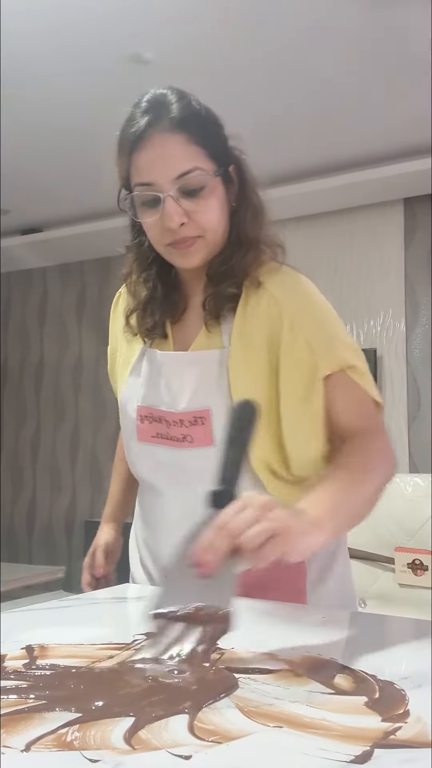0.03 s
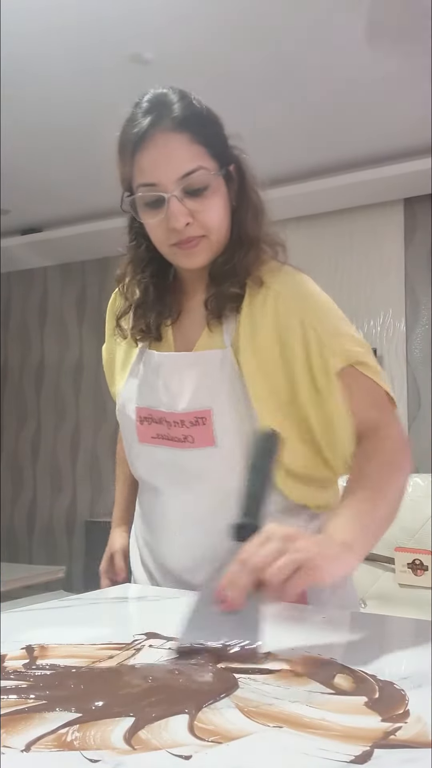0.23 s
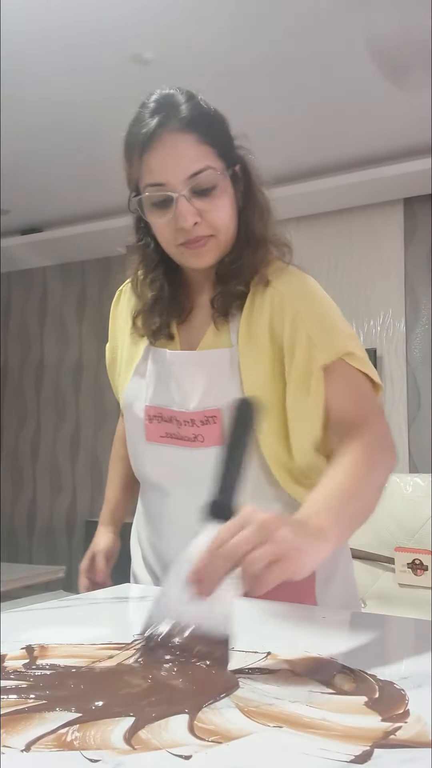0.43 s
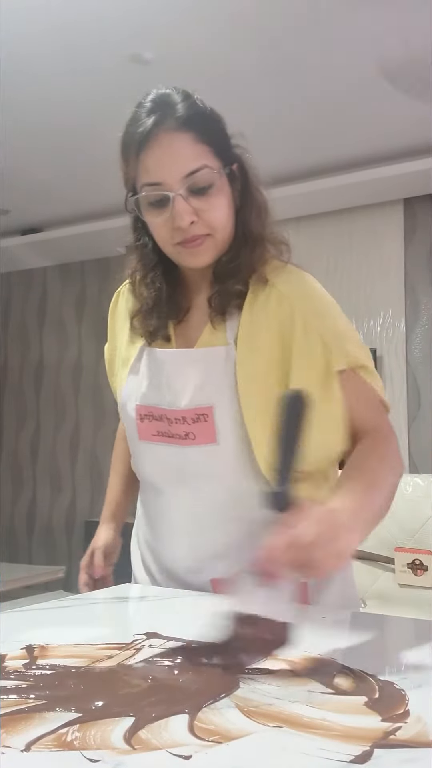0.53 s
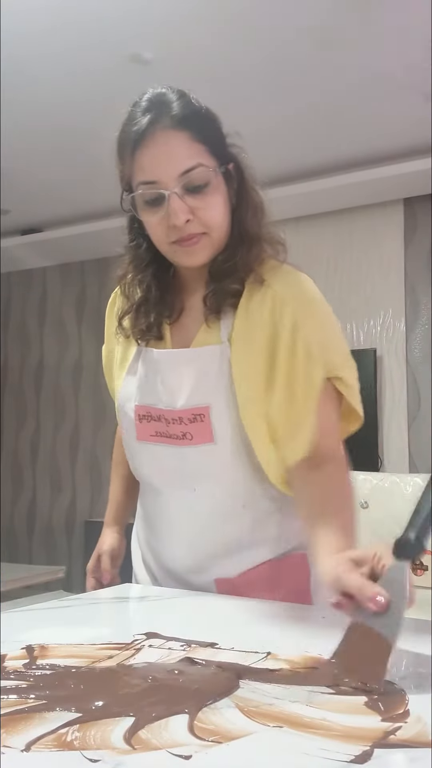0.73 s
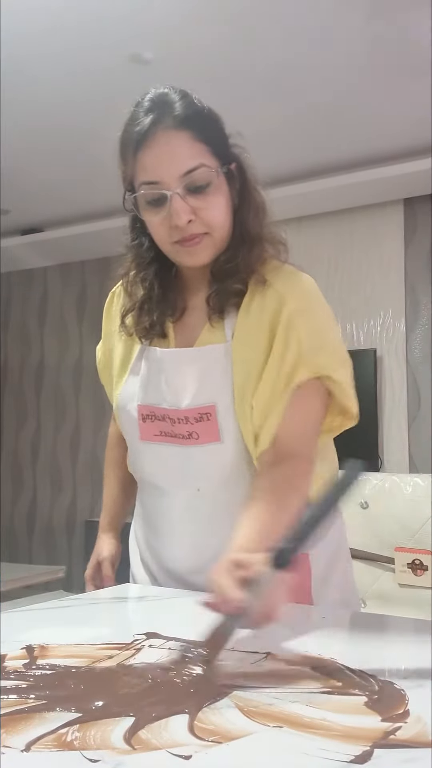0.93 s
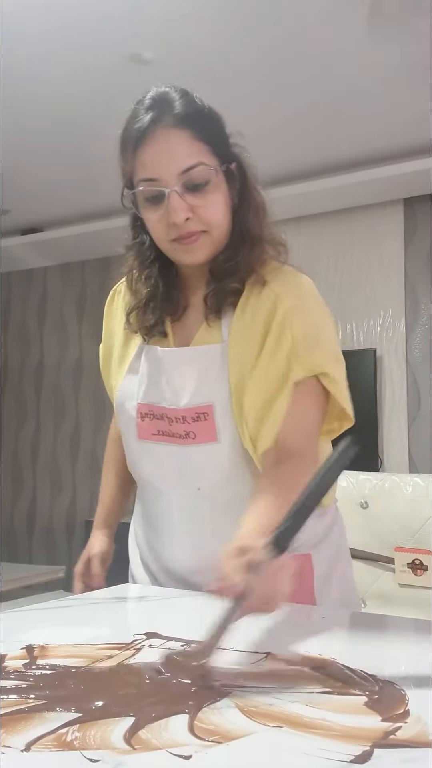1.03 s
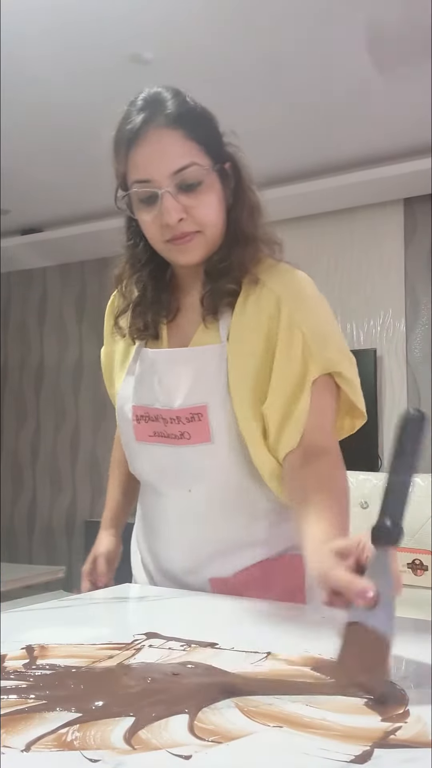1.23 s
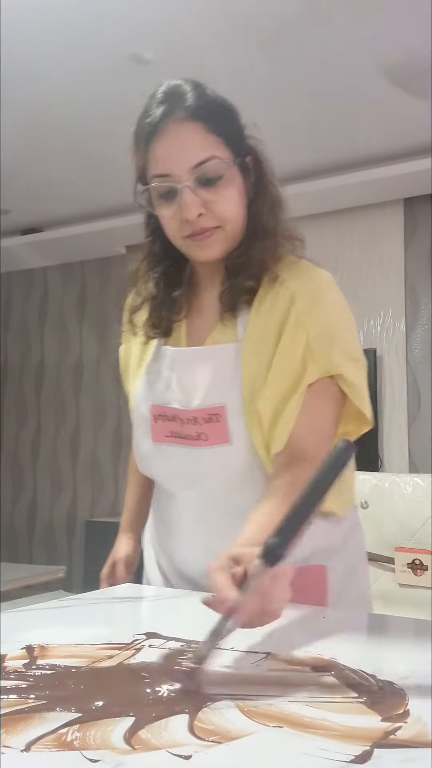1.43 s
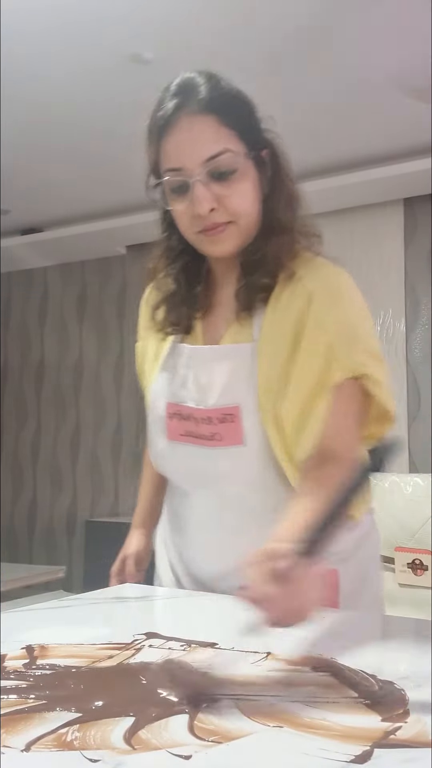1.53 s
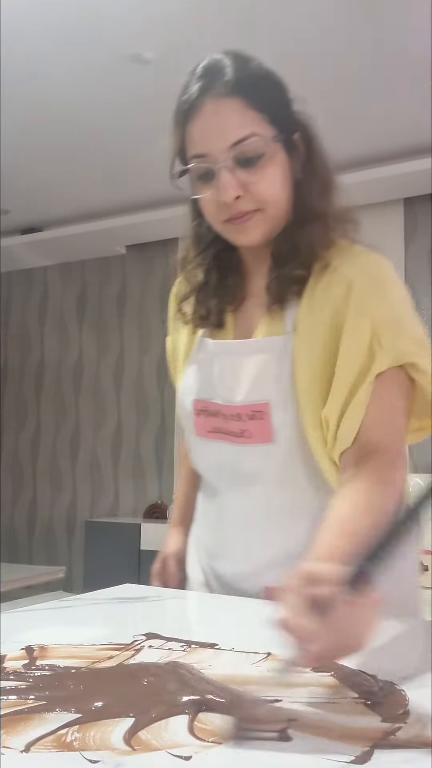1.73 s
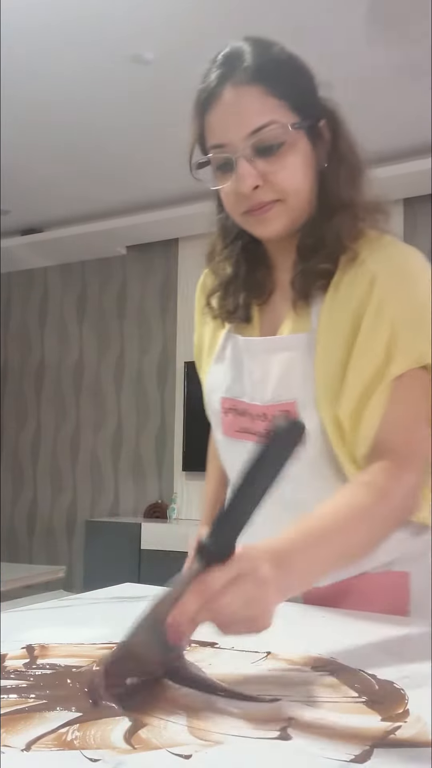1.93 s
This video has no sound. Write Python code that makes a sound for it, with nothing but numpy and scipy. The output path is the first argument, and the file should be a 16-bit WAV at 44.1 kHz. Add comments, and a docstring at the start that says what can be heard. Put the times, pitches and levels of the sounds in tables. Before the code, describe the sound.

A hand-damped steel scraper knocks on a marble slab: a quick, bright, gritty triple contact at 0.2 seconds, a duller knock at 0.7, a double clack at 1.3 and a softer double tap at 1.7. Faint hisses through melted chocolate follow at 0.8-1.0, 1.4-1.5 and 1.8-1.95. A small hard room rings briefly over low wavering hum; phone stereo, slightly right.

```python
"""A small hard room with a low wavering hum; a stereo pair hears the right side first, by 0.13 ms.
Four times a steel scraper is set down on a marble slab: a few quick contacts of the edge, each a filtered knock,
a gritty noise crack, the short modal ring of the hand-damped blade, a shudder of the table and the room's answer.
After each of the last three landings, and once the second has settled, the edge hisses faintly through melted
chocolate: shaped noise with sparse grit. The phone cuts everything above 15.8 kHz."""
import sys
import numpy as np
from scipy import signal
from scipy.fft import rfft, irfft
from scipy.io import wavfile
from scipy.ndimage import uniform_filter1d

SR = 44100
rng = np.random.default_rng(int(sys.argv[2]) if len(sys.argv) > 2 else 0)


def master(y):
    """Save y as 16-bit WAV."""
    cut = np.clip(np.atleast_2d(y).T, -1, 1)
    pcm = np.round(cut * 32767)  # scale
    wavfile.write(sys.argv[1], SR, pcm.astype(np.int16))


N = 88200  # two seconds

# Air of the room: [f/Hz, relative level per Hz/dB]
AIR_SPECTRUM = [(25, -14), (59, -5), (185, -5.5), (300, -9.5), (550, -13.5), (750, -15.5), (1000, -22.5),
                (1600, -24), (2800, -27), (4400, -35), (6500, -40.5), (10000, -52), (16000, -57)]
# Hum of the room, before panning: [f/Hz, rms level/dB]
HUM_TONES = [(76, -60), (134, -72.5), (195, -62.5), (490, -70.5)]
# Contacts of edge and slab; where the edge lands decides which modes ring:
# [t/s, then level/dB of thud, body, knock, clack, tick, sizzle,
#  then ring level/dB of handle, low bend, high bend, steel]
CONTACTS = [(0.1960, 9.5, 17.5, 20, 5, -3, -10.5, 4.5, -1.5, 1, 8.5),
            (0.1971, 2, 7.5, 15, 13.5, 4.5, 6, -3, -4.5, -19, 4),
            (0.1983, 6.5, 9, 9, 5.5, 4, -9, -3, -14, 3.5, 4),
            (0.2074, 11, 7.5, 2, 0, -26, -25, -34, 4.5, -7, 1),
            (0.7152, 10.5, 16, 18, 5, -16, -27, -15.5, -14, -8, -11),
            (0.777, -5, 5, -2.5, -25, -34, -48, 6.5, -3.5, -10.5, -17),
            (1.2902, 8, 10.5, 15, 13, -5, -6, 6, 6.5, -25, -12.5),
            (1.2947, 7, 5, 13, 0, -13, -24, 13.5, 0, -15.5, -4),
            (1.3239, 6, 15, 13, 4.5, -13.5, -29, 4, 3, 5, 8),
            (1.7114, 3.5, 13.5, -9, 1, -15, -34, -7, -5, -25, 0),
            (1.7164, -0.5, 8.5, 3.5, 3.5, -7, -10.5, 3.5, -10, 10, 0)]
# Where thud, body, knock, clack, tick and sizzle lie: [f/Hz]
CONTACT_HZ = [400, 800, 1400, 3400, 7000, 14000]
# Where handle, low bend, high bend and steel modes lie: [f/Hz]
RING_HZ = [510, 1225, 1680, 3420]
# Modes of blade and handle, before each contact's weighting: [f/Hz, peak gain/dB, t60/s]
BLADE_MODES = [(253.6, -14, .09), (509, 1.5, 0.35), (550, 4.5, .09), (706, -0.5, .06), (943, -3.5, .13),
               (1216, 5.5, 0.046), (1674, 2.5, .07), (1860, 5.5, .06), (3040, 2.5, 0.15), (3310, 3.5, 0.14),
               (3580, 1.5, .16), (3936, 0.5, 0.066), (5080, 7.5, 0.12), (11450, 2, .045)]
# Spectra of one contact, before each contact's weighting: [f/Hz, level/dB]
KNOCK_SPECTRUM = [(40, -23.5), (120, -16.5), (280, 1.5), (500, -6), (1000, -7.5), (1750, 1), (2250, -21.5),
                  (3300, 1), (4400, -10.5), (5200, -10), (6200, -3.5), (16000, -19)]
CRACK_SPECTRUM = [(100, -58), (1200, -18), (1700, -23.5), (2300, -16), (3350, -7), (4400, -12.5),
                  (5200, 0.5), (6100, -7.5), (8300, -11.5), (10000, -8), (11400, -2), (13000, -13),
                  (16000, -32.5)]
SHUDDER_SPECTRUM = [(40, -29), (120, -2), (250, -12.5), (450, 6), (950, -8), (1300, -5.5), (1750, -10),
                    (2300, -10), (3350, -3.5), (4400, -12.5), (5200, -4), (6200, -6.5), (8300, -8.5),
                    (16000, -22.5)]
ROOM_SPECTRUM = [(50, -1.5), (130, -7), (450, -3.5), (1000, -20.5), (1800, -9.5), (2400, -13.5),
                 (3400, -11.5), (7000, -12), (16000, -25)]
# Decay of the table and of the room: [f/Hz, t60/s]
SHUDDER_T60 = [(120, .14), (500, 0.12), (1500, 0.062), (4000, 0.24), (12000, 0.044)]
ROOM_T60 = [(120, 0.23), (600, 0.81), (2000, 0.55), (5000, 0.63), (13000, 0.48)]
# Stereo balance of the direct sound: [f/Hz, left minus right level/dB]
DIRECT_PAN = [(120, -0.5), (500, -3), (1400, -2), (3500, -6.5), (8000, 6.5)]
# Strokes of the edge through the chocolate: [start t/s, end t/s, level/dB]
STROKES = [(0.788, 1.008, -63.5), (1.367, 1.487, -59.5), (1.78, 1.956, -62)]
# Hiss of the edge on stone: [f/Hz, relative level per Hz/dB]
HISS_SPECTRUM = [(300, -8.5), (1000, 2.5), (3200, -0.5), (4400, -14.5), (7000, -8.5), (9000, -15.5),
                 (14000, -15.5), (16000, -19)]

AIR_DB, AIR_FLICKER_DB, AIR_FLICKER_PER_S = -51.5, 0.67, 13.9
HUM_WAVER, HUM_WAVER_PER_S = 0.71, 5.2
# Above about this pitch the two microphones hear unrelated noise
AIR_WIDE_HZ, WIDE_HZ = 1250, 800
DIFFUSE_PAN_DB, LEFT_LAG_S = -1.75, 0.00013
BLOW_SIZE = 16384  # samples in one contact
CRACK_T60_S = 0.027
SHUDDER_ONSET_S, SHUDDER_DB = 0.0018, 1.5
ROOM_ONSET_S, ROOM_DB = 0.0091, -1.5
RING_ROOM_DB = 2  # weight of the blade's ring against the knock in what the room hears
DISPERSION_HZ, DISPERSION_WIDTH_HZ = 1430, 810  # bending waves near this pitch arrive late
STROKE_ATTACK_S, STROKE_RELEASE_S = 0.038, 0.024
GRIT_PER_S, GRIT_DB = 320, -12.5
TOP_HZ = 15800


def undb(db):
    """Decibels to gain."""
    return 10 ** (np.asarray(db) / 20)


def unit(x):
    """Scale to rms 1."""
    return x / np.sqrt(np.mean(x ** 2))


def along(points, hz):
    """Read (f/Hz, value) points on a log-frequency axis."""
    p = np.array(points, float)
    return np.interp(np.log(np.maximum(hz, 1)), np.log(p[:, 0]), p[:, 1])


def colour(x, points):
    """Causal minimum-phase filter with the gain of (f/Hz, level/dB) points."""
    n = x.shape[-1]
    size = 2 * n
    log_gain = along(points, np.fft.rfftfreq(size, 1 / SR)) * np.log(10) / 20
    cepstrum = irfft(log_gain)
    # folding the cepstrum forward in time makes the filter causal
    cepstrum[1:n] *= 2
    cepstrum[n + 1:] = 0
    return irfft(rfft(x, size) * np.exp(rfft(cepstrum)))[..., :n]


def convolve(x, response):
    """Play a sound through a response for each channel."""
    return signal.fftconvolve(np.atleast_2d(x), response, axes=-1)[:, :N]


def add(out, x, start):
    """Mix a sound in at its start time."""
    i = int(start * SR)
    n = min(x.shape[-1], N - i)
    out[..., i:i + n] += x[..., :n]


def pan(db):
    """Left and right gains for a left-minus-right level."""
    return undb(np.array([[db], [-db]]) / 2)


def walk(rate):
    """Random levels held 1 / rate s and slewed twice, rms 1."""
    k = int(SR / rate)
    steps = np.repeat(rng.standard_normal(N // k + 1), k)
    return unit(uniform_filter1d(uniform_filter1d(steps, k), k)[:N])


def decay_to_60_db(t, t60):
    """Exponential decay that falls 60 dB in t60 seconds."""
    return np.exp(-np.log(1000) * t / t60)


def diffuse(wide_hz, size=N):
    """White stereo noise, mostly alike on both sides in the bass and unrelated in the treble."""
    hz = np.fft.rfftfreq(size, 1 / SR)
    alike = 0.9 / (1 + (hz / wide_hz) ** 2)
    mid, side = rfft(rng.standard_normal((2, size)))
    mid = mid * np.sqrt((1 + alike) / 2)
    side = side * np.sqrt((1 - alike) / 2)
    return irfft(np.array([mid + side, mid - side]), size) * pan(DIFFUSE_PAN_DB)


def tail(t60s, onset_s, size):
    """Dense reflections that build up and die away, each octave at its own rate."""
    t, hz = np.arange(size) / SR, np.fft.rfftfreq(size, 1 / SR)
    centres = 125 * 2. ** np.arange(8)
    noise, out = rfft(diffuse(WIDE_HZ, size)), 0
    for centre in centres:
        band = along(list(zip(centres, centres == centre)), hz)  # crossfades with its neighbours
        build_up = 1 - np.exp(-(t / onset_s) ** 2)
        envelope = build_up * decay_to_60_db(t, along(t60s, centre))
        out = out + irfft(noise * band, size) * envelope / np.sqrt(np.sum(envelope ** 2))
    return out


def room_air():
    """Broad rumble of the room, its level flickering slightly."""
    level = undb(AIR_DB + AIR_FLICKER_DB * walk(AIR_FLICKER_PER_S))
    return level * unit(colour(diffuse(AIR_WIDE_HZ), AIR_SPECTRUM))


def room_hum():
    """Low tones, each wavering at random in strength and phase."""
    t, hum = np.arange(N) / SR, 0
    for hz, db in HUM_TONES:
        waver = 1 + HUM_WAVER * (walk(HUM_WAVER_PER_S) + 1j * walk(HUM_WAVER_PER_S))
        tone = np.exp(2j * np.pi * (hz * t + rng.random()))
        hum = hum + undb(db) * unit(np.real(waver * tone))
    return hum * pan(DIFFUSE_PAN_DB)


def knock(push):
    """The slab answers the edge's single push with a short filtered click."""
    return colour(push, KNOCK_SPECTRUM)


def crack():
    """Grit under the edge cracks: a quickly dying burst of coloured noise."""
    burst = decay_to_60_db(np.arange(BLOW_SIZE) / SR, CRACK_T60_S)
    noise = diffuse(WIDE_HZ, BLOW_SIZE) * burst / np.sqrt(np.sum(burst ** 2))
    return colour(noise, CRACK_SPECTRUM)


def blade_ring(weights):
    """Hand-damped blade: decaying cosine modes weighted by (f/Hz, level/dB) points."""
    t, out = np.arange(BLOW_SIZE) / SR, 0
    for hz, db, t60 in BLADE_MODES:
        peak_scale = 2 * np.log(1000) / t60 / SR  # makes the mode's spectral peak 1
        gain = undb(db + along(weights, hz)) * peak_scale
        out = out + gain * decay_to_60_db(t, t60) * np.cos(2 * np.pi * hz * t)
    return out


def table_shudder():
    """The table shakes: dense coloured vibration with its own decay in each octave."""
    return undb(SHUDDER_DB) * colour(tail(SHUDDER_T60, SHUDDER_ONSET_S, BLOW_SIZE), SHUDDER_SPECTRUM)


def room_response():
    """Reverberation of the small hard room, drawn afresh for each spot of contact."""
    return undb(ROOM_DB) * colour(tail(ROOM_T60, ROOM_ONSET_S, 2 * BLOW_SIZE), ROOM_SPECTRUM)


def disperse(x):
    """All-pass that spreads a knock over a few cycles, as a plate does."""
    _, poles = signal.iirpeak(DISPERSION_HZ, DISPERSION_HZ / DISPERSION_WIDTH_HZ, fs=SR)
    return signal.lfilter(poles[::-1], poles, x)


def microphones(x):
    """The direct sound reaches the right microphone first; balance depends on pitch."""
    left = colour(x, [(hz, db / 2) for hz, db in DIRECT_PAN])
    right = colour(x, [(hz, -db / 2) for hz, db in DIRECT_PAN])
    lag = np.exp(-2j * np.pi * np.fft.rfftfreq(N, 1 / SR) * LEFT_LAG_S)
    return np.array([irfft(rfft(left) * lag, N), right])


def landings():
    """Each contact knocks and cracks on the slab, rings the blade, shakes the table and excites the room."""
    direct, around = np.zeros(N), np.zeros((2, N))
    push = signal.unit_impulse(BLOW_SIZE)
    for start, *levels_db in CONTACTS:
        shape = list(zip(CONTACT_HZ, levels_db[:6]))
        ring = blade_ring(list(zip(RING_HZ, levels_db[6:])))
        add(direct, colour(knock(push) + ring, shape), start)
        add(around, colour(crack() + table_shudder(), shape), start)
        into_room = colour(push + undb(RING_ROOM_DB) * ring, shape)
        add(around, convolve(into_room, room_response()), start)
    return microphones(disperse(direct)) + around


def strokes():
    """The lubricated edge hisses as it gathers speed, catching on fine grit."""
    t, speed = np.arange(N) / SR, 0
    for start, end, db in STROKES:
        attack = np.clip((t - start) / STROKE_ATTACK_S, 0, 1)
        release = np.exp(-np.maximum(t - end, 0) / STROKE_RELEASE_S)
        speed = speed + undb(db) * attack * release
    catches = rng.random(N) < GRIT_PER_S / SR
    grit = unit(catches * rng.standard_normal(N))
    return speed * unit(colour(diffuse(WIDE_HZ) + undb(GRIT_DB) * grit, HISS_SPECTRUM))


def scene():
    """Room tone throughout, with the landings and strokes over it."""
    return room_air() + room_hum() + landings() + strokes()


def record(dry):
    """The phone cuts the top with a steep elliptic low-pass."""
    low_pass = signal.ellip(8, .2, 70, TOP_HZ, fs=SR, output="sos")  # ripple, stop band in dB
    return signal.sosfilt(low_pass, dry)


dry = scene()
out = record(dry)
master(out)
```